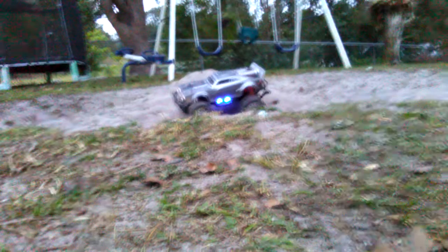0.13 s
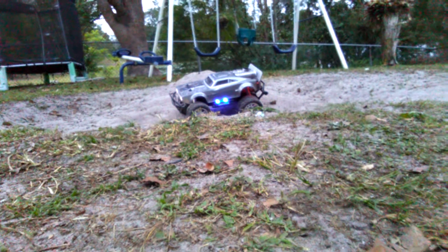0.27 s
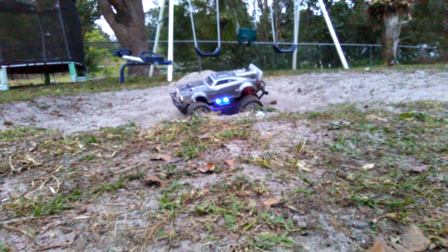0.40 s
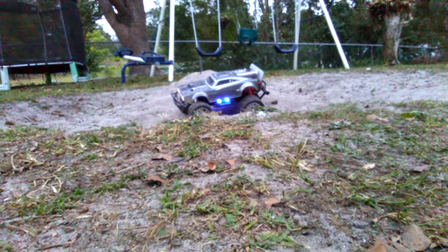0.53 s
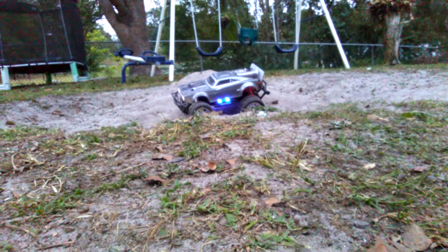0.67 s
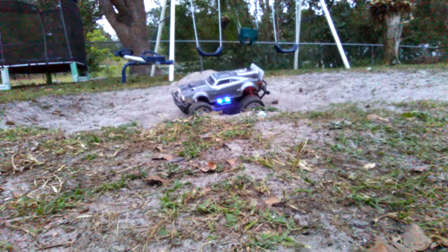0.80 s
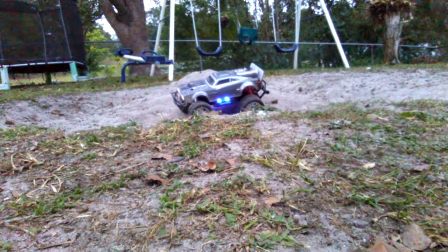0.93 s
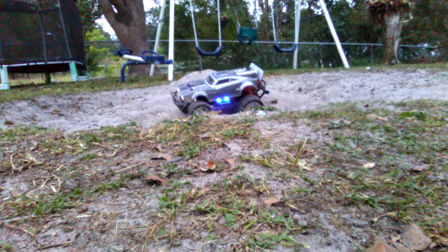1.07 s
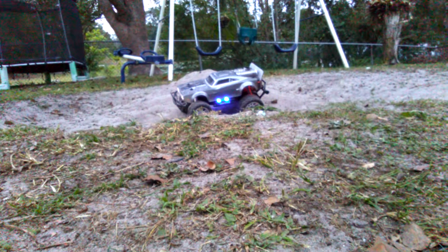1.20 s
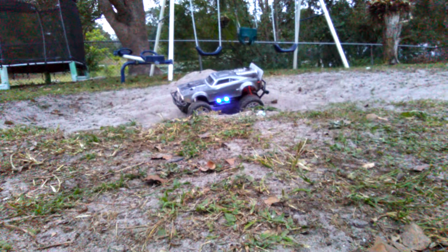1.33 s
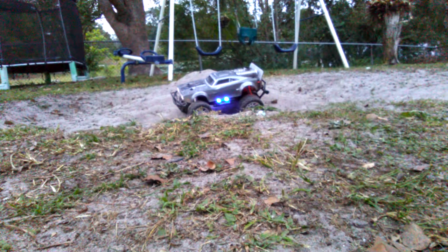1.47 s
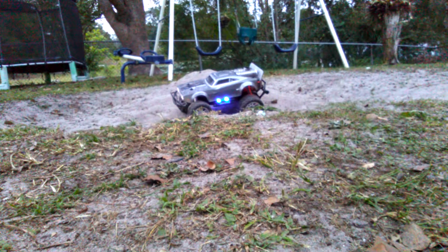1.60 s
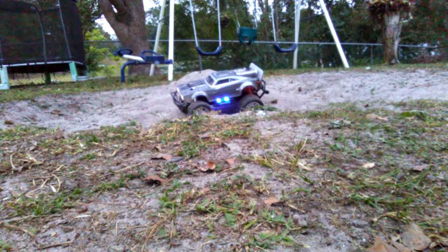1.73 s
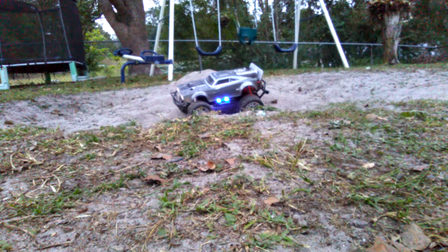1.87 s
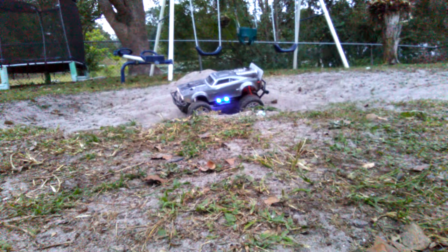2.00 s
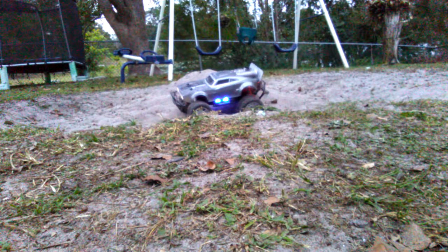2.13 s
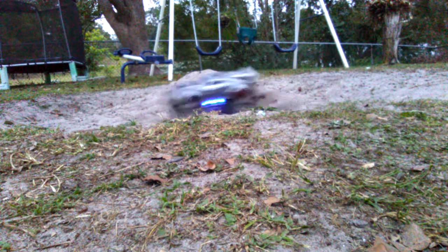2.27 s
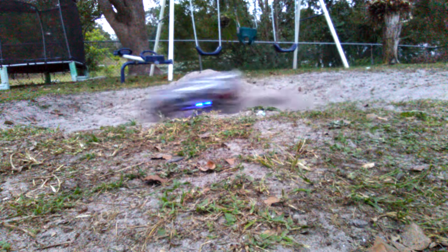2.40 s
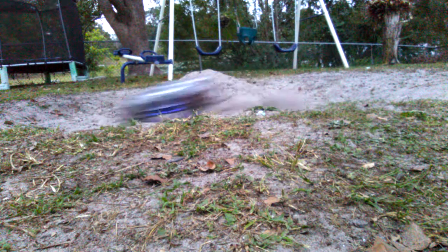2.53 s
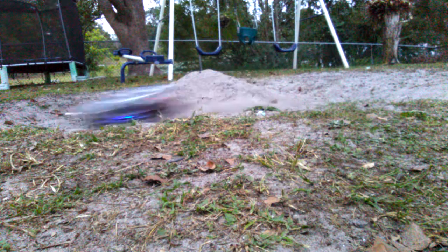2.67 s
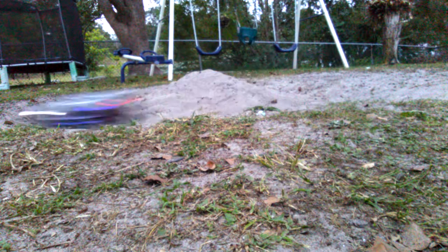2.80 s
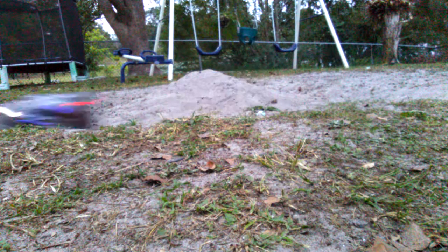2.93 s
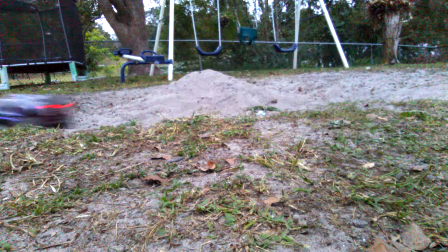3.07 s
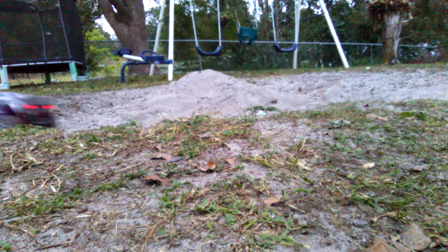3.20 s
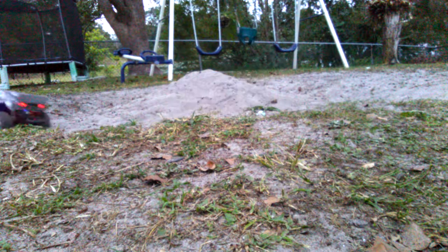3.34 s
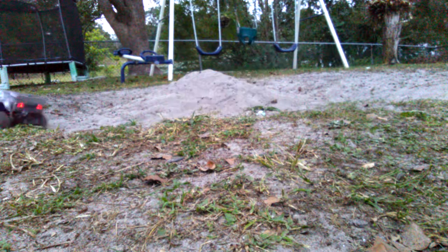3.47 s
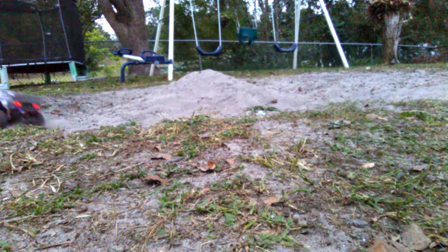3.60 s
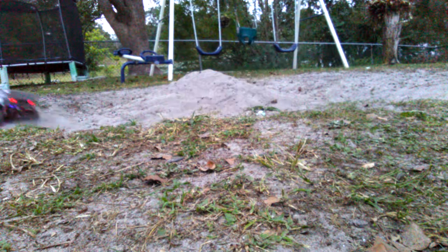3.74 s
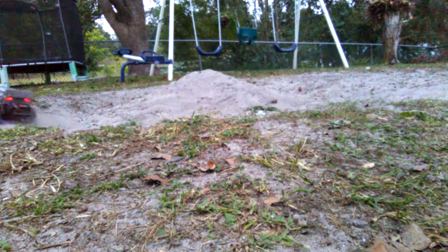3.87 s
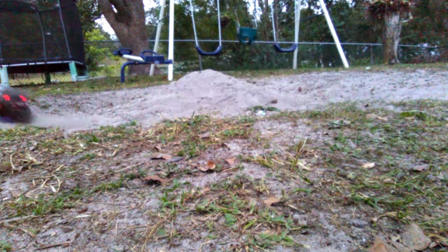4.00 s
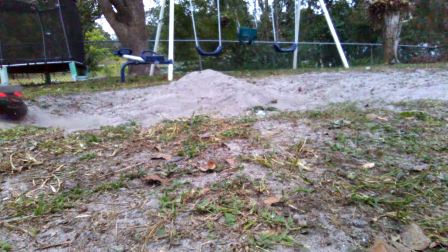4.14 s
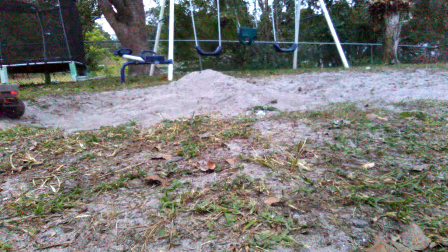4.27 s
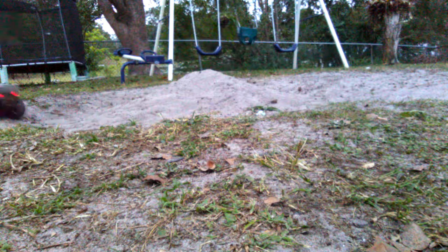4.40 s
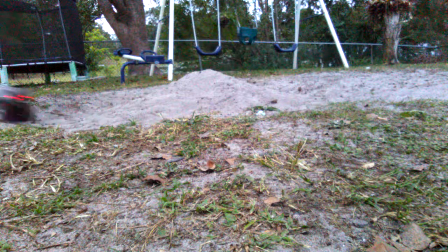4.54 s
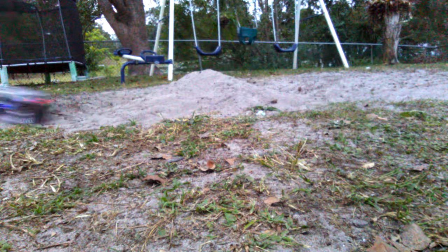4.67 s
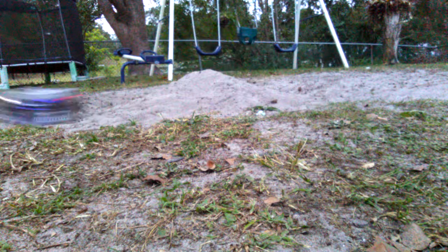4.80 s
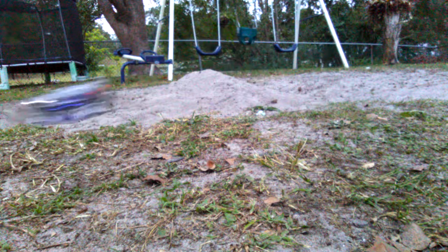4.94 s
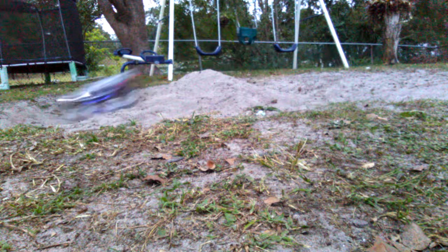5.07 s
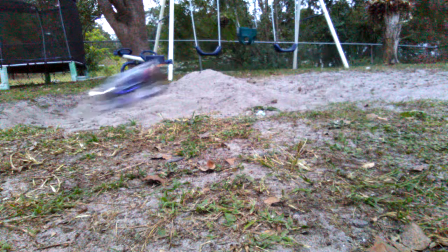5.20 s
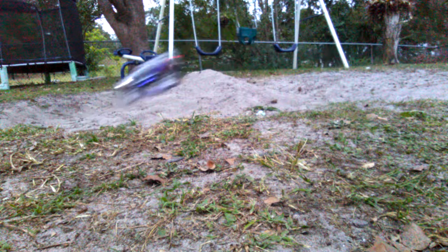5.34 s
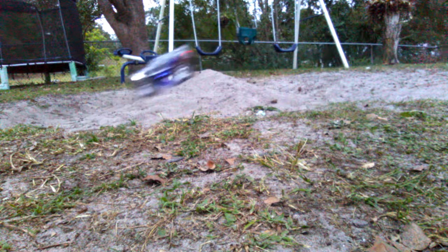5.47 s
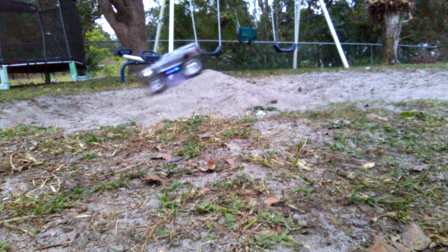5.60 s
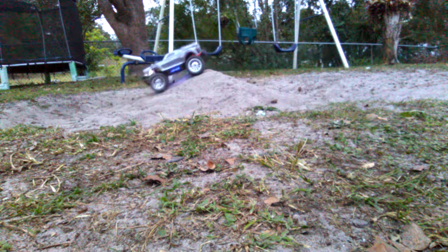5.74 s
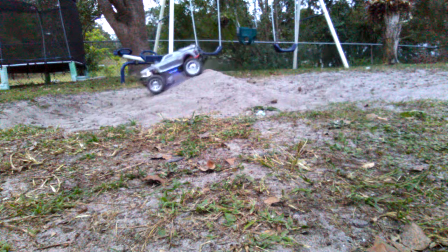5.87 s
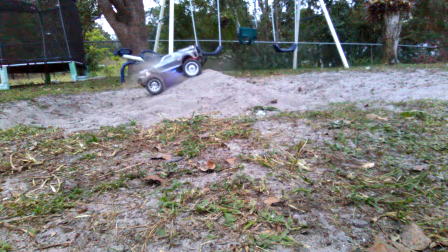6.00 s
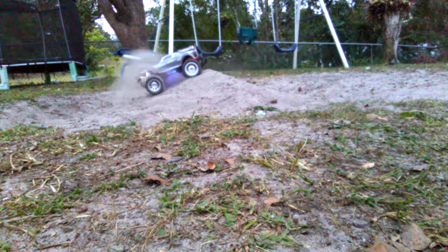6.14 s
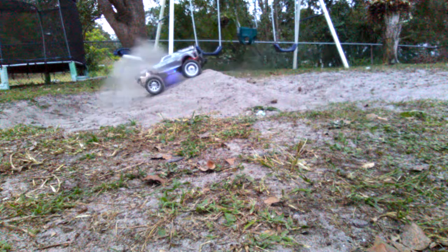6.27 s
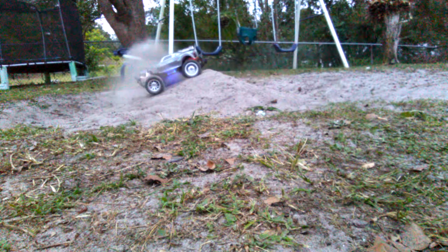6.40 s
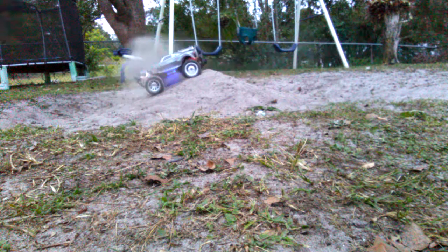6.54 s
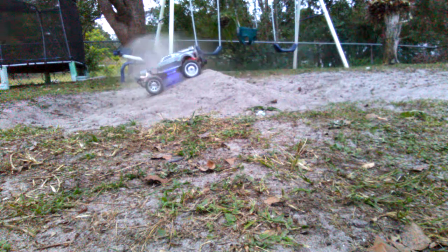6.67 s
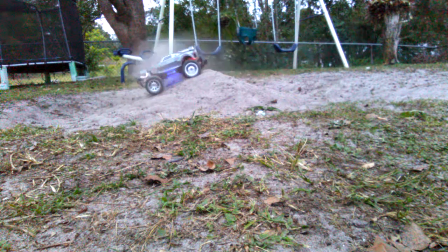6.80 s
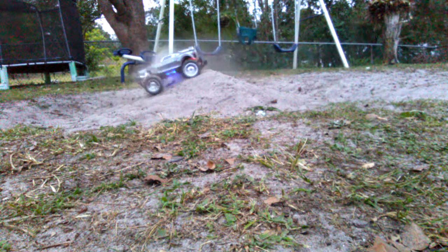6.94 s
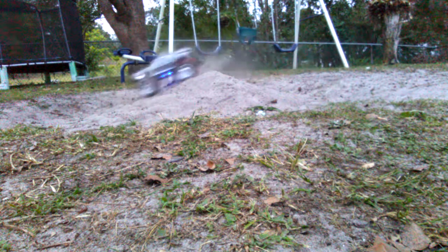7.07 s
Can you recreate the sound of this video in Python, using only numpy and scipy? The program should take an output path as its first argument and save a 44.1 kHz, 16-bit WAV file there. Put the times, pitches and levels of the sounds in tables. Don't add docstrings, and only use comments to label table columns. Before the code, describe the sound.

A quiet yard opens with soft low hum, faint air and a distant one-cylinder engine puttering unevenly, some 25 to 30 puffs a second, with light ticks. A plastic click comes at 0.1 s, a tight cluster with a tiny motor twitch around 1.1 s, and more clicks near 1.75 and 1.95 s. At 2.15 s the toy car's motor leaps up into a loud, rasping gear whine, wavering until 2.9 s. A softer burst runs 3.4 to 4.1 s. From 4.4 to 5.7 s a longer, rougher run carries rattle and bright sand spray. Wheelspin from 5.8 s climbs to a shrill peak by 6.55 s, sags with axle knocks until 6.9 s, then the motor revs up again and is cut off around 7.1 s. Deep wind buffets from 4.8 s, popping hardest near 5.4 s, largely left.

```python
import sys
import numpy as np
from scipy import signal
from scipy.fft import rfft, irfft, next_fast_len
from scipy.io import wavfile
from scipy.ndimage import uniform_filter1d, map_coordinates

SR = 44100
rng = np.random.default_rng(int(sys.argv[2]) if len(sys.argv) > 2 else 0)


def decibels_to_gain(level_db):
    exponent = np.asarray(level_db, float) / 20
    return 10 ** exponent


def unload_wav(signal):
    wavfile.write(
        sys.argv[1],
        SR,
        np.round(np.clip(np.atleast_2d(signal).T, -1, 1) * 32767).astype(np.int16),
    )


N = 313992

# time in seconds, tooth rate in Hz, effort in dB.
EARLY_RUNS = [
    [(1.08, 500, -61), (1.088, 500, -68), (1.138, 500, -54.5), (1.2, 494, -64)],
    [(2.135, 496.6, -64), (2.15, 701, -46.5), (2.2, 1290, -33), (2.325, 2109, -25.5), (2.41, 2336, -24.5),
     (2.67, 2286, -23), (2.76, 1863, -28), (2.84, 1752, -30), (2.885, 1550, -40), (2.91, 1423, -48)],
    [(3.415, 600.5, -67), (3.442, 858, -37), (3.48, 1350, -37), (3.55, 1720, -33), (3.605, 1861, -30.5),
     (3.625, 2144, -28), (3.92, 2256, -27), (3.975, 2020, -31.5), (4.02, 1750, -34.5), (4.037, 1650, -47),
     (4.09, 1495, -58)],
]
# time in seconds, tooth rate in Hz, effort in dB.
LATE_RUNS = [
    [(4.39, 750, -59), (4.416, 947, -37), (4.5, 1651, -30.5), (4.65, 2168, -28), (4.95, 2195, -29.5),
     (5.26, 2322, -25.5), (5.51, 2296, -22.5), (5.6, 2143, -34.5), (5.7, 2040, -55.5)],
    [(5.77, 798, -62), (5.8, 957, -43.5), (5.85, 1459, -30.5), (5.91, 1850, -24.5), (5.97, 2194, -26),
     (6.08, 2508, -25.5), (6.15, 2657, -27), (6.3, 2810, -28), (6.56, 2920, -28.5)],
    [(6.561, 2680, -32.5), (6.82, 1502, -41), (6.85, 1206, -52), (6.92, 857, -37.5)],
    [(6.921, 806, -46), (6.938, 939, -31.5), (6.96, 1171, -31), (7.01, 1536, -26), (7.062, 1948, -25),
     (7.1, 1994, -26), (7.13, 2110, -25)],
]
RUNS = EARLY_RUNS + LATE_RUNS
UNDER_LOAD = [3, 4]
# whine, lowest tooth order, rattle, sand, wheel knock, all in dB.
RUN_BALANCE = [(-50, 0, 3, 4, 1.5), (-3, 1.5, 1, -13, -16), (-0.5, 3.5, 1.5, -8, -28),
               (-12.5, -4, 2.5, -5.5, -13.5), (-6.5, -4, 0.5, -7.5, -4), (-36, 1, -1, -6, -5),
               (-4, -16, 0, -15, -13)]
# time in seconds, tooth rate change in Hz,
# build-up in seconds, recovery in seconds.
RIPPLES = [(2.252, 58, .05, 0.039), (2.299, -100, .04, 0.018), (2.385, -240, 0.042, 0.017),
           (2.453, -340, 0.024, 0.048), (2.532, -71.5, 0.036, 0.031), (2.591, 110.5, 0.04, 0.032),
           (2.624, -48.5, 0.026, 0.035), (3.51, -130, .03, 0.051), (3.699, -220, 0.029, 0.017),
           (3.805, -130, 0.036, 0.03), (3.865, 210, 0.052, 0.021), (3.885, -49.5, 0.015, 0.0302),
           (3.944, -120, .015, .015), (5.25, 60, 0.036, .04), (5.365, 81, 0.027, 0.041),
           (5.43, -90, 0.033, .025), (5.515, 90, 0.026, 0.027)]
# multiple of tooth rate, level in dB.
ORDERS = [(.2, -4), (1, 6), (2, 3), (2.999, -2), (3.998, -6), (6.001, -7)]
# tooth rate in Hz, gain in dB.
BITE = [(500, -14), (1050, -9), (1300, -2.5), (1850, -3), (2100, 0.5), (2650, -2.5), (2800, -1)]
# start in seconds, end in seconds, gain in dB.
MESHED = [(2.318, 2.707, 0), (2.72, 2.735, -6), (3.618, 3.685, -0.5), (3.706, 3.942, -1.5),
          (3.957, 3.977, -4), (7.058, 7.2, 0.5)]
# time in seconds, whine gain in dB.
COASTING = [(0, 0), (2.72, 0), (2.78, -4), (2.92, -10), (3.4, 0), (3.975, 0), (3.99, -10), (4.1, -14),
            (4.3, 0)]
# time in seconds, whine, sand and ring gain in dB.
FLANK = [(4.4, -6, -1, -3), (4.661, -7, 2.5, 1), (4.8, 4, -1, 2), (4.999, 1.5, 2, 3.5),
         (5.2, 6.5, 3.5, 4.5), (5.52, 2, -4, 1), (5.7, 1, -1, -5)]
# frequency in Hz, gain in dB.
SHELL = [(330, -16.5), (420, -10.5), (700, -3.5), (1300, -7.5), (2300, -15.5), (3000, -13.5), (3700, -7),
         (3950, 2), (4800, -2), (5400, 1.5), (6300, -21), (9000, -9.5), (11500, -11), (13500, -7)]
# frequency in Hz, density in dB per Hz.
RASP = [(880, -51), (1500, -50), (1590, -20), (2190, -8), (2540, -15.5), (2820, -11), (3470, -4.5),
        (4070, 2), (4570, 1.5), (5200, 3.5), (5480, 0.5), (6000, -25), (7000, -12.5), (9100, -94),
        (15400, -120)]
# frequency in Hz, density in dB per Hz.
GEARBOX = [(4600,-30), (5150,-11.5), (5450,-3), (5750,-10.5), (6300,-30.5)]
# frequency in Hz, density in dB per Hz.
RATTLE = [(160, -47), (280, -15.5), (376, -11), (444, 3), (623, -4.5), (725, -3), (902, -1.5), (1430, -9.5),
          (1700, -11), (2210, -6.5), (3740, -120)]
# frequency in Hz, density in dB per Hz.
AXLE = [(600,-22), (800,5), (910,13), (1020,0), (1400,-36), (3000,-74)]
# time in seconds, peak in dB.
AXLE_KNOCKS = [(6.115, -47), (6.143, -48), (6.198, -47), (6.218, -44), (6.239, -37), (6.268, -42),
               (6.312, -34.5), (6.345, -42), (6.419, -29.5), (6.46, -41), (6.497, -38), (6.525, -53),
               (6.565, -34), (6.596, -38), (6.64, -36), (6.663, -33.5), (6.704, -40), (6.732, -46),
               (6.752, -41), (6.795, -44), (6.807, -47.5), (6.865, -49), (6.883, -44), (6.907, -39),
               (6.944, -30), (6.969, -36)]
# frequency in Hz, density in dB per Hz.
SAND = [(3650, -19), (6200, 8), (7550, 1.5), (8810, -1), (10800, -3), (11800, -12), (13600, -39),
        (14100, -32), (14600, 7)]
# frequency in Hz, gain in dB.
NOTCHES = [(1400, 0.5), (1620, -5), (1850, -4), (2400, -2), (2540, -9), (2680, 3), (3200, -0.5), (3400, 0)]
# time in seconds, lag in ms.
LEFT_LAG = [(2.2, 0.043), (2.7, 0.091), (3.2, 0.18), (4.3, 0.26), (4.8, 0.16), (5.3, 0.11), (5.8, 0.057),
            (7.1, 0.059)]
# time in seconds, peak in dB, ring in Hz, knock in dB, snap in dB.
CLICKS = [(0.1375, -36, 2460, 1, 14.5), (1.0908, -31, 1700, -25, -11), (1.1042, -32.5, 1780, -26, -26),
          (1.125, -25, 1730, -39, -24), (1.1422, -29, 1810, -28, -27), (1.16, -38, 850, -30, -30),
          (1.18, -41, 860, -30, -30), (1.7538, -40.5, 2460, -29, -5), (1.951, -44, 1210, -30, -25),
          (1.9689, -31, 1160, -12, -23), (1.9705, -32, 2050, -30, -25), (1.972, -34, 2680, -27, -18),
          (2.141, -37, 3460, -21, -1), (3.4394, -46.5, 1142, 5.5, 9), (4.3966, -46, 1232, -1, 0),
          (4.418, -38.5, 1010, -6, 13.5), (5.6204, -44, 3350, -20, 2), (5.789, -50, 1387, -10, -4),
          (6.9315, -34, 1520, -13, 4)]
# time in seconds, exhaust, yard hum and air in dB.
IDLE = [(0,-50,-41,-54), (.5,-48.5,-51,-54), (.8,-50.5,-53,-53.5), (1.5,-45,-50,-55), (2.1,-46.5,-48,-53.5),
        (3.2,-43,-48,-53.5), (4.3,-45.5,-51.5,-53.5), (5.7,-39,-50.5,-55.5), (7.12,-77,-70,-55.5)]
# time in seconds, firings per second.
HUNT = [(0, 25.53), (.24, 25.79), (.39, 29.58), (.75, 26.32), (1.22, 28.77), (1.65, 24.79), (1.96, 29.19),
        (2.33, 26.78), (2.65, 28.95), (3.18, 25.12), (3.46, 29.14), (3.9, 24.94), (4.29, 29.69),
        (4.6, 24.93), (5.61, 26.15), (5.97, 25.68), (6.49, 28.82), (7.3, 29.07)]
# frequency in Hz, gain in dB.
EXHAUST = [(20, -38), (28, 6), (56, -0.5), (85, 3), (112, 4.5), (140, 8), (170, -9), (250, -19), (400, -35),
           (700, -31)]
# frequency in Hz, density in dB per Hz.
TICK = [(1760, -31), (3000, -27), (3560, -24), (3980, 3), (5390, -3), (5990, 3), (8450, 2.5), (9510, -37.5),
        (10300, -10), (14500, -53)]
# time in seconds, peak in dB.
TICKING = [(0, -66), (.8, -48), (1.6, -49.5), (2, -51), (7.1, -46)]
# time in seconds, peak in dB.
ACCENTS = [(0.181, -40.5), (0.2177, -36.5), (0.2543, -40.5), (0.3267, -41.5), (0.3609, -43), (0.3978, -42),
           (0.429, -42.5), (0.5689, -43), (0.6045, -42), (0.644, -40), (0.6827, -39), (0.717, -40),
           (0.754, -36), (0.7906, -40), (0.828, -41), (0.8662, -40), (0.9043, -40.5), (0.942, -42),
           (0.977, -42), (1.0121, -44), (1.049, -41), (1.2594, -45), (1.3671, -43), (1.714, -40),
           (2.9398, -37), (2.9737, -39.5), (3.2062, -51), (3.2461, -38), (3.3945, -39), (4.097, -33),
           (4.1357, -34), (4.207, -39), (4.2409, -38)]
# time in seconds, gain in dB.
BROAD = [(0, -2), (1.3, 2.5), (2.2, -8), (4, -11), (7.1, -13)]
# frequency in Hz, density in dB per Hz.
HUM = [(88, -6), (150, -7), (257, -9), (306, -17), (477, -12), (548, -21.5), (1200, -31.5), (1560, -44),
       (2640, -120)]
# frequency in Hz, density in dB per Hz.
AIR = [(530,3), (900,-3.5), (1290,-2), (1590,-6.5), (2660,-10.5), (4100,-6.5), (4900,-8), (5250,-7.5),
       (5600,0.5), (6000,-8), (8340,-12), (9600,-16.5), (13300,-22), (14600,-58)]
# frequency in Hz, density in dB per Hz.
GUST = [(7.1, -36), (12, 6.5), (32, 0), (59, -1.5), (139, -11.5), (321, -31), (400, -38), (520, -63),
        (880, -120)]
# peak time in seconds, level in dB, left minus right in dB.
GUSTS = [(.1, -46, -6), (.6, -67, -4), (1.1, -51.5, -14), (1.6, -54, -13), (2.2, -51, -7), (2.8, -69, -6),
         (3.7, -58, -3), (3.98, -41, 8), (4.24, -52.5, -15), (4.75, -41, -16), (4.91, -30, 7.5),
         (5.12, -33, 5), (5.3, -41, 21), (5.46, -30, 10), (5.62, -32.5, -2), (5.93, -28, -3.5),
         (6.2, -36, 16), (6.5, -42, -10), (6.909, -34, -3), (7.06, -39, -9)]
# time in seconds, peak in dB, left minus right in dB, T60 in seconds.
POPS = [(4.879, -19, 16.5, 0.1), (5.419, -12, 13, 0.057), (5.543, -24.5, 26, 0.048),
        (5.854, -28, 10, 0.092), (6.014, -28.5, 22.5, 0.079), (6.152, -42, 19, 0.04)]
# frequency in Hz, left minus right in dB.
PORTS = [(100,0), (700,0.5), (1300,0), (2400,3), (3400,1), (4100,3), (5200,17), (5800,1.5), (6500,2),
         (8300,-4.5), (9300,2), (11500,2), (13500,-7.5)]
# frequency in Hz, left-right likeness from 0 to 1.
ALIKE = [(100, 0.94), (600, 0.93), (1400, 0.1), (3000, 0.69), (5000, 0.32), (9000, 0.19), (14000, 0.03)]

ENGAGE_HZ, ENGAGE_SPAN_HZ = 1700, 290
FREE_RASP_DB, TOOTH_AT_SPEED_DB = -2, 0.5
RING_DB, RING_AT_SPEED_DB = -8.5, 2.5
RATTLE_DB, RATTLE_GROWS, EFFORT_MID_DB = -41, 0.44, -27.5
SLACK_DB, MESH_S = -9.5, .004
KNOCK_RISE_S, KNOCK_T60_S, KNOCK_DB = 0.0029, 0.042, -0.5
CLICK_RISE_S, PARKED_UNTIL_S, PARKED_PAN_DB = 0.00088, 2.3, 14
FIRST_FIRING_S, START_S = 0.01834, 0.0043
SWELL_DB_PER_S, FADE_DB_PER_S, CALM_DB = 59, 63, -50


def car():
    gate, tooth_hz, effort_db, at_speed = drive()
    whine_db, tooth_db, rattle_db, sand_db, knock_db = per_run(RUN_BALANCE)
    near_db, spray_db, ring_db = curves([(4.3, 0, 0, 0)] + FLANK)
    loaded = bursts([RUNS[k] for k in UNDER_LOAD])[0]

    size = gate * decibels_to_gain(effort_db + whine_db + near_db + curves(COASTING)[0] + along(BITE, tooth_hz))
    free_tooth_db = tooth_db + TOOTH_AT_SPEED_DB * at_speed
    clean = whine(size * (1 - loaded), tooth_hz, free_tooth_db, jitter=.016, scatter=.055,
                  flutter_db=2.4, second=mesh())
    rough = whine(size * loaded, tooth_hz, tooth_db, jitter=.022, scatter=.15, flutter_db=2.5)

    bumps_db = .8 * wobble(14) + 1.5 * wobble(30)
    over_db = effort_db - EFFORT_MID_DB
    shake_db = RATTLE_DB + rattle_db + np.maximum(over_db, -12) * RATTLE_GROWS + np.minimum(over_db + 15.5, 0)
    noise = decibels_to_gain(effort_db - 4.0) * gear_rasp(bumps_db, at_speed, loaded, ring_db)
    noise = noise + decibels_to_gain(shake_db - 2.5) * chassis_rattle(bumps_db, knock_db)
    noise = noise + decibels_to_gain(effort_db + sand_db + spray_db) * thrown_sand(bumps_db)

    both = coloured(gate * noise + axle() + clean + rough, NOTCHES)
    late = curves(LEFT_LAG)[0] * SR / 1000
    left = map_coordinates(both[0], [np.arange(N) - late], mode="nearest")
    return np.array([left, both[1]])


def drive():
    gate, tooth_hz, effort_db = bursts(RUNS)
    t = np.arange(N) / SR
    for s, change, build, recover in RIPPLES:
        tooth_hz = tooth_hz + change * np.interp(t, [s - build, s, s + recover], [0, 1, 0])
    return gate, tooth_hz, effort_db, np.clip((tooth_hz - ENGAGE_HZ) / ENGAGE_SPAN_HZ, 0, 1)


def whine(size, tooth_hz, tooth_db, jitter, scatter, flutter_db, second=1):
    phase = 2 * np.pi * np.cumsum(tooth_hz * (1 + jitter * (wobble(110) + wobble(300)))) / SR
    tone = 0
    for k, db in ORDERS:
        flutter = flutter_db * (.55 * wobble(35) + 1.4 * wobble(300))
        lowest_db = min(k, 1) * (k < 2) * tooth_db
        share = decibels_to_gain(db + lowest_db + flutter) * (second if k == 2 else 1)
        smear = scatter * k * k * np.sqrt(k) + 0.53 * (k <= 1)
        tone = tone + share * np.sin(k * phase + smear * wobble(900))
    return coloured(size * tone, SHELL)


def mesh():
    t = np.arange(N) / SR
    gain = decibels_to_gain(SLACK_DB)
    for start, end, db in MESHED:
        gain = gain + decibels_to_gain(db) * np.clip(np.minimum(t - start, end - t) / MESH_S + .5, 0, 1)
    return gain


def gear_rasp(bumps_db, at_speed, loaded, ring_db):
    rasp = streaky(rush(RASP, decibels_to_gain(bumps_db + 3.0 * wobble(250))), depth_db=1.8)
    rasp = decibels_to_gain(FREE_RASP_DB * at_speed * (1 - loaded)) * rasp
    ring = rush(GEARBOX, decibels_to_gain(3.03 * wobble(90)))
    return rasp + decibels_to_gain(RING_DB + ring_db + RING_AT_SPEED_DB * at_speed) * ring


def chassis_rattle(bumps_db, knock_db):
    lug_swing = np.sin(2 * np.pi * np.cumsum(34 + 8 * wobble(12)) / SR)
    lugs = decibels_to_gain(11 * lug_swing + 2.7 * wobble(30))
    return rush(RATTLE, decibels_to_gain(bumps_db + 2.2 * wobble(120))) + decibels_to_gain(knock_db) * rush(AXLE, lugs)


def thrown_sand(bumps_db):
    grains = decibels_to_gain(1.2 * rng.exponential(size=N // 20 + 1)).repeat(20)[:N]
    return streaky(rush(SAND, decibels_to_gain(bumps_db + 0.52 * wobble(350)) * grains), depth_db=6)


def axle():
    taps, t = np.zeros(N), np.arange(SR // 12) / SR
    s, db = np.transpose(AXLE_KNOCKS)
    taps[np.round(s * SR).astype(int)] = decibels_to_gain(db + KNOCK_DB)
    shape = (1 - np.exp(-t / KNOCK_RISE_S)) * decibels_to_gain(-60 * t / KNOCK_T60_S)
    return abs(signal.fftconvolve(taps, shape / shape.max())[:N]) * rush(AXLE)


def clicks():
    out, t = np.zeros((2, N + SR)), np.arange(SR // 10) / SR
    for s, db, hz, knock_db, snap_db in CLICKS:
        pan_db = PARKED_PAN_DB * (s < PARKED_UNTIL_S)
        noise = rng.standard_normal((2, len(t)))
        body = unit(coloured(noise[0], [(250, -18), (600, 6.0), (3000, 2), (5000, -2), (8000, -36)]))
        tones = 1.0 * np.sin(2 * np.pi * hz * t) + 0.3 * np.sin(3.1 * np.pi * hz * t)
        ring = decibels_to_gain(-60 * t / 0.04) * (tones + 0.61 * body)
        thud = 0.8 * np.sin(2 * np.pi * 510 * t) + 0.56 * np.sin(2 * np.pi * 330 * t)
        knock = decibels_to_gain(knock_db + 12.5 - 60 * t / 0.04) * thud
        snap = decibels_to_gain(snap_db + 8 - 60 * t / 0.017) * np.diff(noise[1], prepend=0)
        click = (1 - np.exp(-t / CLICK_RISE_S)) * (ring + knock) + snap
        sides = decibels_to_gain([[pan_db / 2], [-pan_db / 2]])
        out[:, round(s * SR):][:, :len(t)] += decibels_to_gain(db - 7.0) * sides * click
    return coloured(out[:, :N], [(200, 2), (350, 10.0), (8000, -3.5), (14000, -25)])


def engine():
    exhaust_db, hum_db, air_db = curves(IDLE)
    turns = np.cumsum(curves(HUNT)[0]) / SR
    turns = turns - turns[round(FIRST_FIRING_S * SR)]
    times = np.interp(np.arange(int(turns[-1]) + 1), turns, np.arange(N) / SR)
    luck = rng.standard_normal((len(times), 2))
    puffs, taps = np.zeros((2, N))
    puffs[np.round(times * SR).astype(int)] = -decibels_to_gain(3.3 * luck[:, 0])
    exhaust = decibels_to_gain(exhaust_db) * unit(coloured(puffs, EXHAUST + [(1500, -83)]))

    tick_db = np.interp(times, *np.transpose(TICKING)) + 3 * luck[:, 1]
    for s, db in ACCENTS:
        nearest = np.argmin(abs(times - s))
        times[nearest], tick_db[nearest] = s, db - 1
    taps[np.round(times * SR).astype(int)] = decibels_to_gain(tick_db)
    decay = decibels_to_gain(-60 * np.arange(SR // 20) / SR / 0.045)
    tick_noise = 0.41 * decibels_to_gain(curves(BROAD)[0]) * rush(TICK) + 0.39 * rush(GEARBOX)
    tick = abs(signal.fftconvolve(taps, decay)[:N]) * tick_noise

    hum = decibels_to_gain(hum_db + 3.95 * wobble(5.7)) * rush(HUM)
    air = decibels_to_gain(air_db + wobble(12.9)) * rush(AIR, likeness=0.038)
    return exhaust * np.ones((2, 1)), hum, tick + air


def wind():
    lumps = decibels_to_gain(4.6 * np.array([wobble(14), wobble(14)]))
    out = decibels_to_gain(6.0) * gusts() * unit(lumps * rush(GUST, likeness=0.64))
    t = np.arange(SR // 8) / SR
    puff_curve = [(30, 2.0), (70, 6.0), (250, -2.5), (450, -17.5), (1200, -58), (4000, -92)]
    for s, db, pan_db, t60 in POPS:
        puff = unit(coloured(rng.standard_normal(len(t)), puff_curve))
        shape = (1 - np.exp(-t / 0.0062)) * decibels_to_gain(-60 * t / t60)
        sides = decibels_to_gain([[pan_db / 2], [-pan_db / 2]])
        out[:, round(s * SR):][:, :len(t)] += decibels_to_gain(db + 4.0) * sides * puff * shape
    return out


def gusts():
    t, power = np.arange(N) / SR, decibels_to_gain(2 * CALM_DB)
    for s, db, pan_db in GUSTS:
        level_db = db - np.maximum(SWELL_DB_PER_S * (s - t), FADE_DB_PER_S * (t - s))
        power = power + decibels_to_gain(2 * level_db + np.array([[pan_db], [-pan_db]]))
    return np.sqrt(power)


def ports(x):
    left = coloured(x[0], [(hz, db / 2) for hz, db in PORTS])
    right = coloured(x[1], [(hz, -db / 2) for hz, db in PORTS])
    return np.array([left, right])


def unit(x):
    return x / np.sqrt(np.mean(x ** 2) + 1e-20)


def along(points, hz):
    f, v = np.transpose(points)
    return np.interp(np.log(hz + 1), np.log(f + 1), v)


def curves(rows):
    s, *cols = np.transpose(sorted(rows))
    return [np.interp(np.arange(N) / SR, s, c) for c in cols]


def per_run(rows):
    return curves([(run[end][0], *row) for run, row in zip(RUNS, rows) for end in (0, -1)])


def bursts(tables, fade=0.0041):
    t = np.arange(N) / SR
    gate = sum(np.clip(np.minimum(t - b[0][0], b[-1][0] - t) / fade + .5, 0, 1) for b in tables)
    return [np.clip(gate, 0, 1)] + curves([row for b in tables for row in b])


def wobble(rate):
    knots = rng.standard_normal(int(N * rate / SR) + 2)
    return np.interp(np.arange(N) * rate / SR, np.arange(len(knots)), knots)


def coloured(x, points):
    m = next_fast_len(x.shape[-1] + 8192)
    gain = decibels_to_gain(along(points, np.fft.rfftfreq(m, 1 / SR)))
    return irfft(rfft(x, m) * gain, m)[..., :x.shape[-1]]


def rush(spectrum, texture=1, likeness=1):
    m = next_fast_len(N + 8192)
    hz = np.fft.rfftfreq(m, 1 / SR)
    turn = np.arccos(np.clip(likeness * along(ALIKE, hz), -1, 1)) / 2
    noise = rfft(texture * rng.standard_normal((2, N)), m) * decibels_to_gain(along(spectrum, hz))
    a, b = noise * [np.cos(turn), np.sin(turn)]
    return unit(irfft(np.array([a + b, a - b]), m)[:, :N])


def streaky(x, depth_db):
    z = signal.stft(x, nperseg=512)[2]
    field = uniform_filter1d(rng.standard_normal(z.shape[1:]), size=2, axis=0)
    field = uniform_filter1d(field, size=12, axis=1)
    return unit(signal.istft(z * decibels_to_gain(depth_db * unit(field)), nperseg=512)[1][:, :N])


def scene():
    opening = np.clip(np.arange(N) / SR / START_S, 0, 1)
    return ports(opening * (car() + sum(engine()))) + clicks() + opening * wind()


def top_cut(x):
    return signal.sosfilt(signal.butter(12, 15370, fs=SR, output="sos"), x)


def record(dry):
    mix = coloured(dry, [(14250, -4.5), (14350, -70)])
    return top_cut(mix)


dry = scene()
out = record(dry)
unload_wav(out)
```